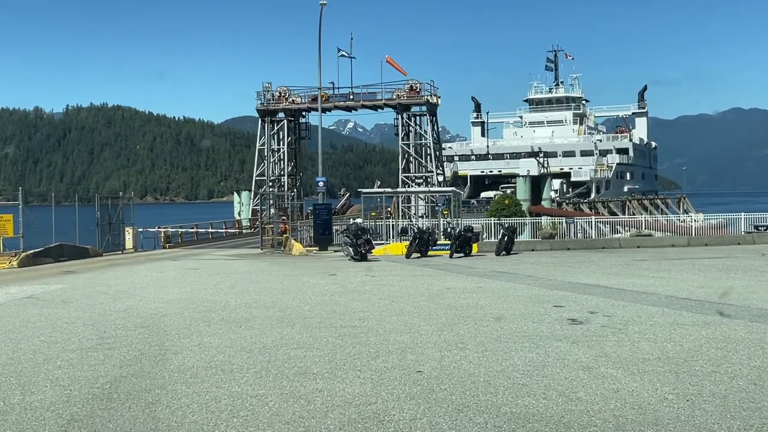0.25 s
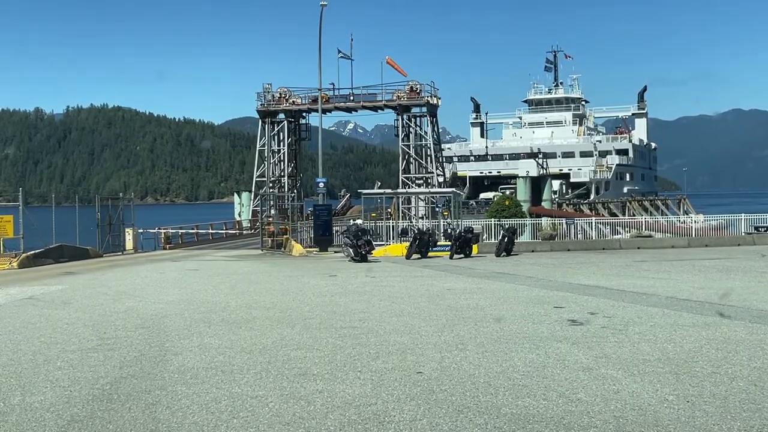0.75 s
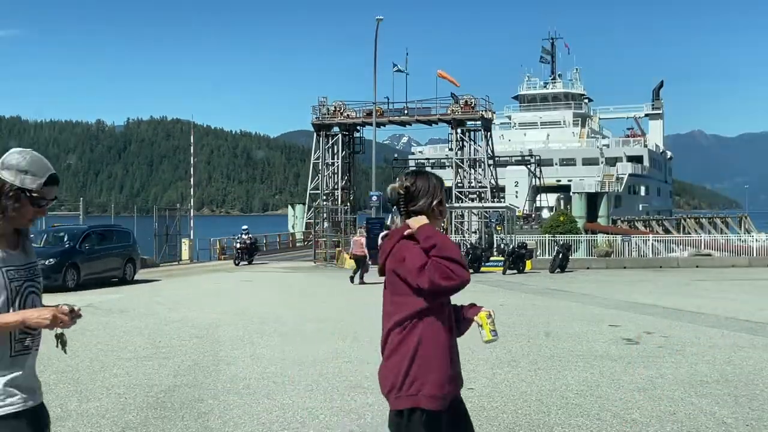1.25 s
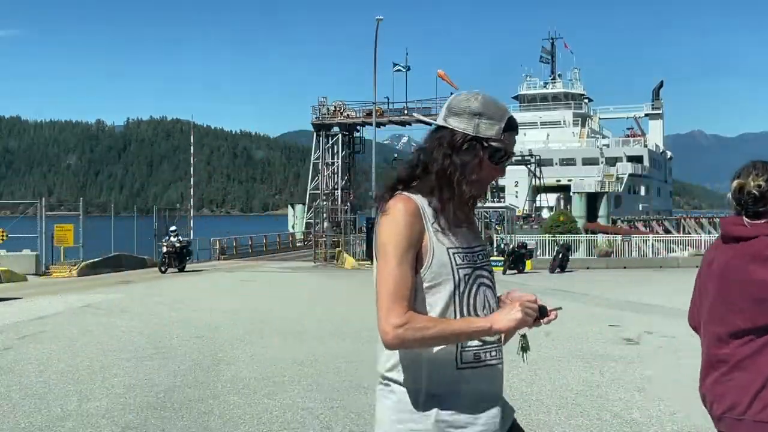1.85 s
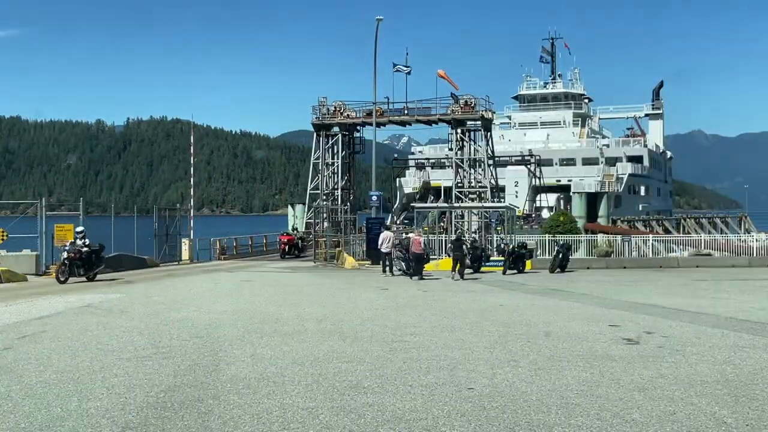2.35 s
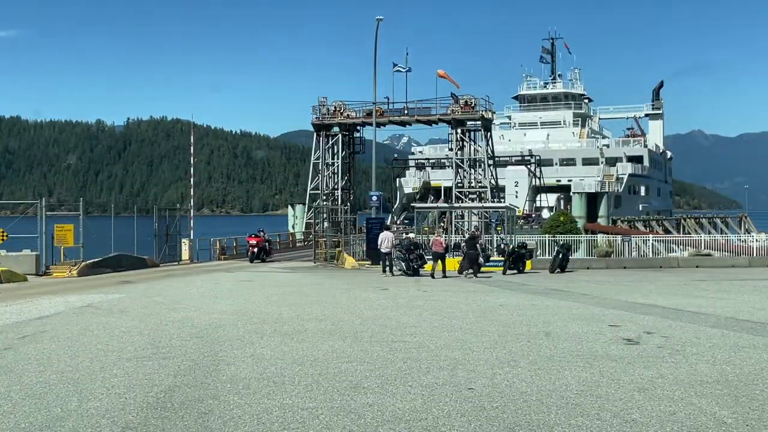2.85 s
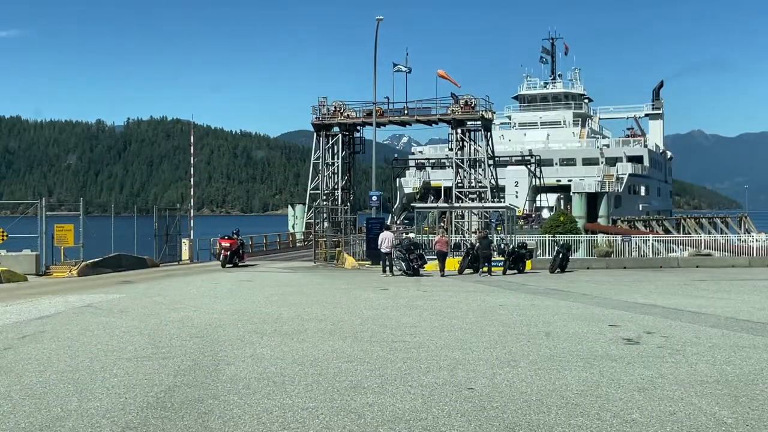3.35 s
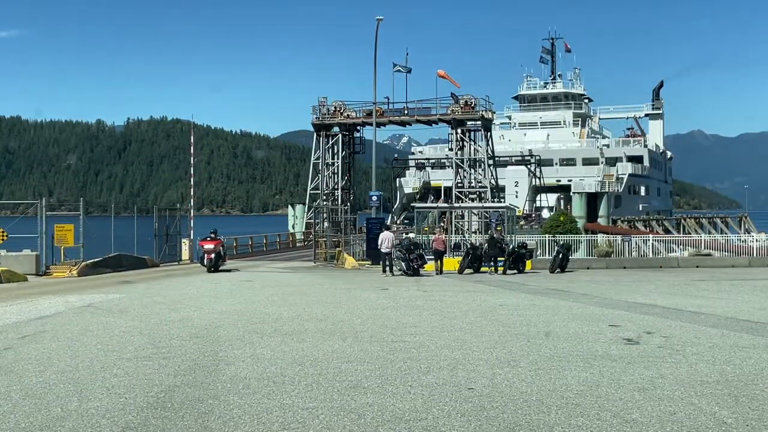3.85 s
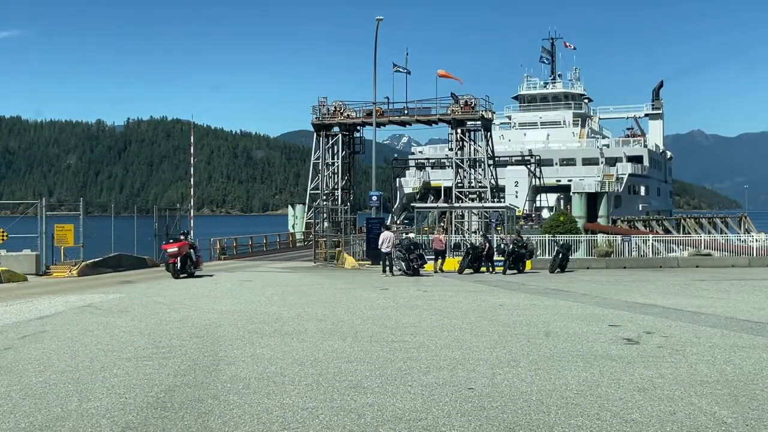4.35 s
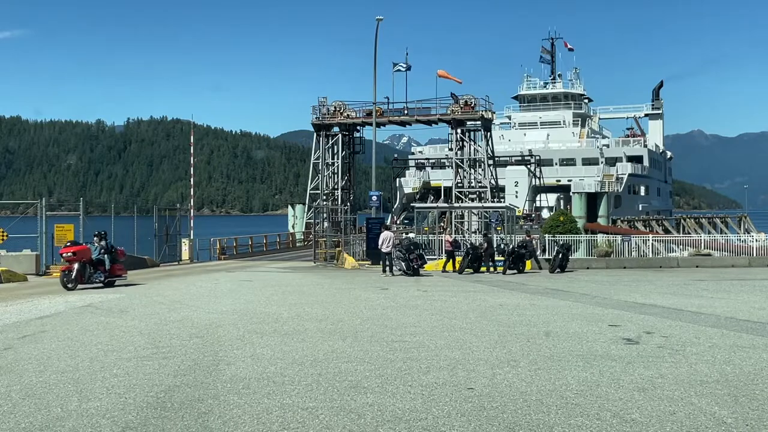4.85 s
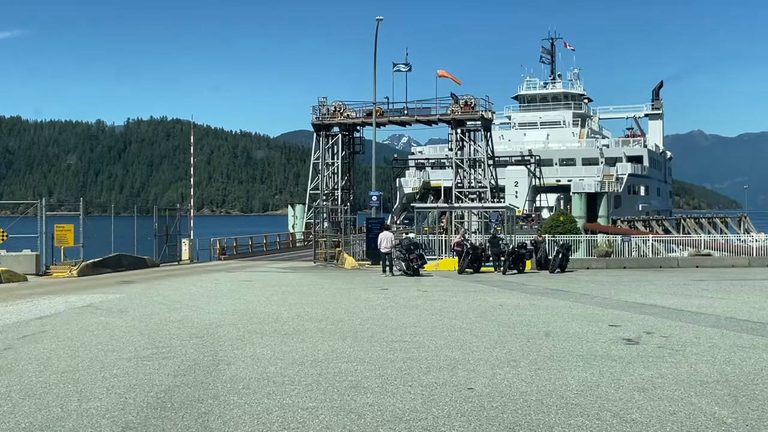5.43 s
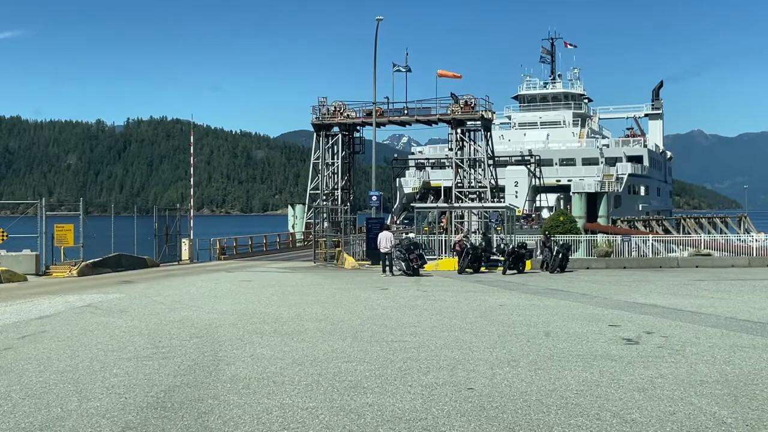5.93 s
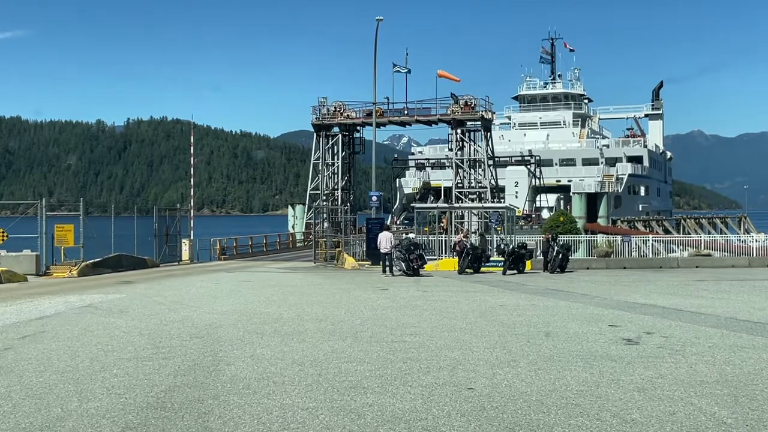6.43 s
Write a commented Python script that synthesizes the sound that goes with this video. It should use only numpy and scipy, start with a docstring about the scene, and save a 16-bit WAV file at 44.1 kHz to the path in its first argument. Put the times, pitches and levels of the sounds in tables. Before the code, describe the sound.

A quiet low hum inside a waiting car gives way abruptly to motorcycles riding off a ferry. A smoother engine rolls by first, while a two-cylinder bike chugs behind it with booming, ragged beats. A few small plastic knocks and rustles sound close by. The chugging bike then accelerates into a loud, rising drone, passes close with faint tyre hiss, and drops in pitch as the throttle shuts.

```python
"""First you hear the low hum inside a waiting car. After a second it gives way abruptly to motorcycles
riding off a ferry: a two-cylinder bike (the twin) chugs along behind a smoother one. Each firing of its
engine is one puff from the exhaust, and the car's cabin makes the puffs boom. The rider speeds up, so the
beats melt into a loud drone; the bike passes close with hissing tyres, then the throttle shuts.
A few small things knock, rustle and clink inside the car."""
import sys
import numpy as np
from scipy import signal
from scipy.fft import rfft, irfft, next_fast_len
from scipy.io import wavfile
from scipy.ndimage import uniform_filter1d

SR = 44100
rng = np.random.default_rng(int(sys.argv[2]) if len(sys.argv) > 2 else 0)


def store_pcm(level_fs):
    """Save levels as 16-bit WAV."""
    pcm = np.round(np.clip(level_fs, -1, 1) * 32767).astype(np.int16)
    wavfile.write(sys.argv[1], SR, np.atleast_2d(pcm).T)


N = 295029
TIME = np.arange(N) / SR
BIKES_S, OPEN_S, SHUT_S = .941, 4.66, 6.32  # the bikes come in, the throttle opens, the throttle shuts


# how fast the twin fires: t/s, f/Hz
FIRING_RATE = [(1.6, 17.8), (2.3, 19.35), (3.4, 16), (3.8, 17.6), (4.2, 22.3), (4.45, 22.8), (4.8, 29),
               (5.0, 33), (5.2, 37), (5.296, 39.5), (5.588, 46), (5.664, 49), (5.764, 49.6), (5.862, 52.3),
               (6.068, 55.6), (6.314, 57.4), (6.358, 55), (6.404, 54.8), (6.49, 48.7), (6.592, 41.6),
               (6.69, 38.9)]
def twin_engine():
    """Firing rate, running count of firings, roughness (0-1) and how far the throttle is shut (0-1)."""
    idle_hz = 16.5
    hz, shut = curve(FIRING_RATE), ramp(SHUT_S, 0.053)
    turns = np.cumsum(hz) / SR
    rough = np.clip((idle_hz / hz) ** 1.7 + 0.54 * shut, .01, 1)  # ragged at idle and once shut
    return hz, turns, rough, shut


# the drone's overall loudness: t/s, level/dB
DRONE_LEVEL = [(4.55, -24.5), (5.0, -15.5), (5.2, -12.5), (5.3, -10), (5.5, -9.5), (5.65, -12), (6.0, -5.5),
               (6.25, -2.5), (6.42, -4), (6.69, -10)]
# its tones: multiple of the firing rate, level/dB with the throttle open, level/dB with it shut
DRONE_TONES = [(2, -13.5, -18.5), (3, -21, -3), (4, -4.5, -2), (5, 0.5, -2), (6, -10.5, -17),
               (7, -4.5, -2.5), (8, -22.5, -18), (9, -25, -11.5)]
# which pitches the pipe and cabin favour: f/Hz, level/dB
DRONE_COLOUR = [(65.0, -39), (88.0, -4), (110.0, -1.6), (125.0, -8), (148, -17), (163, -16.5), (175, -33.5),
                (190.0, -15), (222.0, -14), (255.0, -18), (272.0, -29), (286.0, -15.5), (310.0, -44),
                (345.0, -15.5), (385.0, -20)]
# the same once the bike is heard from behind: f/Hz, level/dB
BEHIND_COLOUR = [(75, -13.5), (110, 1), (125, -8), (150, -20), (185, -9.5), (230, -19), (275, -13),
                 (305, -10.5), (345, -19.5), (400, -22), (490, -20.5), (560, -27)]
def drone(hz, turns, rough, shut):
    """Fast beats melt into low tones, each swelling as it slides through a pitch the pipe favours."""
    shaken = turns + (.005 + .018 * rough) * wander(29.4)
    tones = np.zeros(N)
    for k, open_db, shut_db in DRONE_TONES:
        db = (1 - shut) * (read(DRONE_COLOUR, k * hz) + open_db)
        db += shut * (read(BEHIND_COLOUR, k * hz) + shut_db)
        lag = .15 * k ** 2 + .6 * shut * wander(7)  # pipe and cabin delay the higher tones more
        tones += gain_of(db + 2.9 * rough * wander(11.7)) * np.cos(2 * np.pi * k * shaken - lag)
    return np.sqrt(2) * gain_of(curve(DRONE_LEVEL)) * tones * ramp(4.425, 0.41)


# how exhaust beats sound in the cabin: f/Hz, level/dB
CHUG_COLOUR = [(26, -62.5), (45, -57), (59, -71), (67, -10.5), (83, -3.5), (110, 10.5), (135, -2),
               (165, -18), (223, -11.5), (295, -13), (387, -25), (477, -10), (643, -27), (920, -34),
               (1420, -58), (1600, -62), (2080, -86), (3520, -120)]
# how their loudness moves: t/s, level/dB of the boom, level/dB of the thud above it
CHUG_LEVEL = [(0.96, -27, -43.5), (1.2, -38.5, -42.5), (1.32, -31, -42.5), (1.56, -36, -44),
              (1.62, -31.5, -41.5), (1.8, -36.5, -40.5), (1.98, -33, -43), (2.16, -39.5, -42),
              (2.22, -34.5, -44.5), (2.34, -39, -43.5), (2.82, -30.5, -40), (2.88, -35, -39.5),
              (3.36, -30, -38.5), (3.9, -36.5, -36), (4.32, -26, -36.5), (4.62, -28.5, -32.5),
              (4.86, -30, -29.5)]
def chug(turns, rough):
    """Ragged exhaust beats boom in the cabin, mixed with other bikes' until the twin draws near."""
    twin = evened(firings(turns, rough, scatter_db=1.3, limp=.05, jitter_s=.00025))
    twin = evened(.15 * twin + echoes(twin, t60=.25))
    other_turns = np.cumsum(43 + 4 * wander(2.996)) / SR
    others = evened(firings(other_turns, np.ones(N), scatter_db=0, limp=0.021, jitter_s=0.00396))
    others = others + .5 * echoes(others, t60=0.3)
    share = .8 - .55 * ramp(3.4, 1.1)
    beats = coloured(np.sqrt(1 - share ** 2) * twin + share * others, CHUG_COLOUR)
    boom = steadied(band(beats, 57.7, 152.7), seconds=0.096) * gain_of(curve(CHUG_LEVEL))
    thud = steadied(band(beats, 183.0, 400.5)) * gain_of(curve(CHUG_LEVEL, column=2) - 1.0)
    return (boom + thud) * (1 - ramp(4.67, 1.0))


# the tone of the low burble: f/Hz, level/dB
BURBLE_COLOUR = [(40, -54), (62, -38), (85, -1.5), (130, 9), (200, -3), (270, -7.5), (350, 3.5), (450, -5),
                 (560, -22), (900, -49.5), (2000, -74)]
def burble(hz, turns, shut):
    """Fuel burns unevenly: the burble clears with speed and is loudest once the throttle shuts."""
    pulses = firings(turns, np.ones(N), scatter_db=1.0, limp=0.49, jitter_s=0.00319)
    pulling_db = -31 - 15.5 * np.log2(np.maximum(hz / 39.3, 1))  # fades above 39.3 firings a second
    level = ramp(5.16, 0.096) * gain_of((1 - shut) * pulling_db - 25 * shut)
    beats = coloured(pulses + 1.67 * echoes(pulses, t60=0.24), BURBLE_COLOUR)
    return steadied(beats, seconds=0.041) * level


# the loudness of the exhaust's bark: t/s, level/dB
BARK_LEVEL = [(.95, -55.5), (2.05, -51.5), (3.8, -53), (4.4, -47), (4.82, -48.5), (4.93, -45.5),
              (5.25, -41.5), (5.6, -46.5), (6.0, -47), (6.28, -51), (6.35, -41), (6.45, -40.5), (6.58, -39),
              (6.64, -35.5), (6.69, -36)]
# its tone at full throttle: f/Hz, level/dB
OPEN_COLOUR = [(250, -22.5), (410, -7), (490, 4.5), (560, 10), (680, 4), (800, 1.5), (1000, -5), (1130, -9),
               (1400, -31), (2400, -53), (4000, -46)]
# its tone with the throttle shut: f/Hz, level/dB
SHUT_COLOUR = [(250, -13), (400, 8.5), (470, 3), (560, 1), (740, -5.5), (880, -3), (1130, -15),
               (1450, -7.5), (2000, -29), (4000, -41)]
def bark(turns, rough, shut):
    """The gritty edge of each beat, with a puff of gas; opening the throttle makes it brighter."""
    pulses = firings(turns, rough, scatter_db=1.8, limp=.08, jitter_s=.0007)
    pulses = band(.1 * pulses + echoes(pulses, t60=.13), 150, 1300)
    puffs = rng.standard_normal(N) * (1 + 0.3 * np.exp(-(turns % 1) / 1.5))
    gas = (.12 + .8 * ramp(OPEN_S, 0.27)) * steadied(pulses) + evened(puffs)
    soft = evened(band(coloured(gas, CHUG_COLOUR), 343, 1260))
    whirr = gain_of(-17.0) * evened(band(gas, 844, 974, order=2))
    hard = (1 - shut) * evened(coloured(gas, OPEN_COLOUR)) + shut * evened(coloured(gas, SHUT_COLOUR))
    bright = ramp(4.85, 0.46)
    # the pipe rings hollow as the throttle opens
    honk = gain_of(-39.5) * swell(5.02, 0.13) * steadied(band(gas, 465, 513, order=2))
    return steadied((1 - bright) * (soft + whirr) + bright * hard) * gain_of(curve(BARK_LEVEL)) + honk


# high engine tones: multiple of the firing rate (played rounded), level/dB far, coming and alongside
BUZZ_TONES = [(8, -44, -40, -44.5), (9, -56, -44, -50), (9.96, -50, -44, -42.5), (11, -45.5, -42, -42),
              (12.07, -50, -44.5, -40.5), (12.92, -44.5, -44, -39), (14.22, -49, -49.5, -44.5),
              (14.7, -52, -55, -49.5), (16.07, -53, -42, -47), (16.854, -53.5, -50, -56),
              (18, -58, -47, -54), (18.8, -61, -57.5, -63.5), (19.9, -59, -59, -60), (24.2, -58, -67, -72),
              (25.42, -56, -67, -74)]
# where the pipe rings: f/Hz, half-width/Hz, boost/dB
PIPE_RINGS = [(488, 10, 9.5), (690, 7.2, 9), (795, 5, 4.5), (998, 10, 7)]
def buzz(hz, turns, rough, shut):
    """High tones grow as the throttle opens, fluttering and swelling where the pipe rings."""
    coming, passed = ramp(5.55, 0.29), ramp(6.0, 0.15)
    shaken = turns + (.002 + .012 * rough) * wander(22)
    tones = np.zeros(N)
    for k, far_db, coming_db, alongside_db in BUZZ_TONES:
        db = (1 - passed) * ((1 - coming) * far_db + coming * coming_db) + passed * alongside_db
        db += 2.2 * wander(6)
        db += sum(boost / (1 + ((k * hz - pipe_hz) / width) ** 2) for pipe_hz, width, boost in PIPE_RINGS)
        tones += gain_of(db) * np.cos(2 * np.pi * (round(k) * shaken + rng.random()))
    return np.sqrt(2) * tones * gain_of(-9.5 * shut) * ramp(OPEN_S, 0.64) ** 2


# the twin's whines: start t/s, end t/s, start f/Hz, end f/Hz, half-width/Hz, level/dB
WHINES = [(5.2, 5.6, 3680, 4380, 99, -56), (5.14, 6.5, 4200, 4100, 151, -63),
          (5.15, 6.3, 4650, 5080, 130, -63), (5.14, 6.05, 10200, 10800, 260, -65.5),
          (5.74, 5.95, 4830, 4520, 80, -62), (5.76, 6.8, 2500, 4900, 64, -63),
          (5.9, 6.1, 3900, 3950, 120, -57.5), (5.92, 6.13, 5050, 5030, 110, -62)]
def whines():
    """Fuzzy whines swell and fade, sliding up or down as the twin passes."""
    out = np.zeros(N)
    for start, end, start_hz, end_hz, width_hz, db in WHINES:
        along = ramp(start, end - start)
        tone = np.exp(2j * np.pi * np.cumsum(start_hz + (end_hz - start_hz) * along) / SR)
        fuzz = wander(width_hz) + 1j * wander(width_hz)
        out += gain_of(db) * np.sin(np.pi * along) * (tone * fuzz).real
    return out


# how fast the leading bike fires: t/s, f/Hz
LEAD_RATE = [(1, 48.5), (1.5, 48), (2.0, 50), (2.4, 51), (2.8, 50), (3.1, 48.5), (3.6, 47.5), (4, 47)]
# its overall loudness: t/s, level/dB
LEAD_LEVEL = [(1, -50.5), (1.8, -43), (2.3, -40), (2.8, -41), (3.4, -41), (4, -43.5)]
# its tones: multiple of the firing rate, level/dB
LEAD_TONES = [(2, 1.5), (4, 0), (6, -15), (9, -12), (18, -24)]
def lead_bike():
    """A smoother engine ahead of the twin rolls by at a nearly even speed."""
    turns = np.cumsum(curve(LEAD_RATE) + .15 * wander(7)) / SR
    tones = sum(gain_of(db + 2 * wander(9.3)) * np.cos(2 * np.pi * k * turns) for k, db in LEAD_TONES)
    return gain_of(curve(LEAD_LEVEL)) * tones * (1 - ramp(4.003, 0.18))


def far_bike():
    """A farther engine hums briefly, its pitch rising and falling with its loudness."""
    arch = np.sin(np.pi * ramp(3.5, 1.5))
    turns = np.cumsum(213 + 9 * arch) / SR
    return gain_of(-38 + 2.0 * wander(8.8)) * arch * np.cos(2 * np.pi * turns)


# the hiss from far off: f/Hz, level/dB
FAR_HISS_COLOUR = [(590, 4.5), (1000, 0), (1160, -3), (1330, -0.5), (1430, -6.5), (1580, -2), (2450, -8.5),
                   (3110, -6.5), (3450, -11.5), (3960, -3.5), (5720, -12.5), (9360, -12.5), (12500, -18),
                   (14100, -17.5), (15500, -45)]
# the hiss from close by: f/Hz, level/dB
NEAR_HISS_COLOUR = [(760, 2.5), (1300, 3), (1470, -4.5), (1620, 0), (1790, -5), (2250, -6.5), (3380, -8.5),
                    (3710, -2), (4420, -8.5), (4950, -5), (5440, -9), (10800, -14), (14000, -22),
                    (15000, -32), (15500, -39)]
# narrow bands that ring in it: f/Hz, width/Hz, level/dB
HISS_RINGS = [(3130, 520, -17), (3870, 250, -10.5), (4820, 230, -20), (5950, 130, -20.5)]
# each bike's swell of hiss: t/s when nearest, level/dB, half-width/s
PASSES = [(3.5, -56, 0.67), (5.98, -48, 0.87)]
def hiss(turns):
    """Tyres and engines hiss, throbbing faintly with the firings and swelling as each bike passes."""
    noise = rng.standard_normal(N) * (1 + 0.11 * np.cos(2 * np.pi * turns)) * gain_of(0.9 * wander(9))
    noise = .96 * noise + .28 * echoes(noise, t60=.05)
    far_hiss = gain_of(1.43) * evened(coloured(noise, FAR_HISS_COLOUR))
    near_hiss = gain_of(3.0) * evened(coloured(noise, NEAR_HISS_COLOUR))
    rings = sum(gain_of(db) * evened(band(noise[::-1], hz - width / 2, hz + width / 2, order=1))
                for hz, width, db in HISS_RINGS)
    passing = sum(gain_of(db) ** 2 / (1 + ((TIME - s) / width) ** 2) ** 2.44 for s, db, width in PASSES)
    level = np.sqrt(gain_of(-58.5) ** 2 + passing)
    near = ramp(4.73, 0.87)
    return level * ((1 - near) * far_hiss + near * near_hiss + rings)


# the tone of tyres close by: f/Hz, level/dB
TYRE_COLOUR = [(1000, -22), (2400, 3), (4000, -7), (7000, -1.5), (11000, -5), (15000, -9)]
def tyre_rush():
    """Tyres hiss brightly for a moment as the twin comes alongside."""
    return gain_of(-51) * swell(5.75, 0.098) * evened(coloured(rng.standard_normal(N), TYRE_COLOUR))


# knocks: t/s, click level/dB, click f/Hz, hollow ring level/dB, f/Hz that the struck spot favours
KNOCKS = [(2.080, -51, 3900, -57, 700), (2.0944, -47, 8200, -48, 700), (2.1125, -39, 3640, -46, 700),
          (2.982, -45, 4300, -29, 1130), (2.986, -40.5, 4770, -32, 1143), (3.002, -42.5, 5600, -36, 1143),
          (3.014, -44, 4570, -37, 1143), (3.261, -46, 2000, -22, 760), (3.4695, -21.5, 5100, -13, 1140),
          (3.473, -39, 6300, -13.5, 330), (3.480, -34, 3900, -18, 566), (3.525, -43, 6400, -50, 1140)]
# the notes of the car's plastic trim: f/Hz, level/dB, time to die away/s
TRIM_NOTES = [(236, -2, 0.07), (328, -0.5, 0.05), (545, 3, 0.089), (620, 0, 0.084), (770, -0.5, 0.04),
              (1122, -3, 0.027), (1306, -10.5, 0.055)]
# the dry tone of clicks and rustles: f/Hz, level/dB
CRISP = [(300, 18.5), (1100, 3.0), (1900, -1.5), (4000, 2.0), (6300, -0.5), (9000, -5.5), (15000, -8.5)]
def knocks():
    """Plastic trim is knocked: a dry click with a short bright ring over a hollow one."""
    out, t = np.zeros(N), np.arange(SR // 5) / SR
    for s, click_db, click_hz, hollow_db, spot_hz in KNOCKS:
        fade = gain_of(-60 * t / 0.041) + 0.036 * gain_of(-60 * t / 0.6)
        burst = rng.standard_normal(len(t)) * fade * (1 - np.exp(-t / 0.0003))
        bright = gain_of(5.5) * band(burst, click_hz - 310, click_hz + 310, order=1)
        click = coloured(burst, CRISP) + bright
        # notes lose 22 dB for each octave away from the favoured pitch
        hollow = sum(gain_of(db - 22 * abs(np.log2(hz / spot_hz)) - 60 * t / t60)
                     * np.sin(2 * np.pi * (hz * t + rng.random())) for hz, db, t60 in TRIM_NOTES)
        hollow *= (1 - np.exp(-t / 0.00076)) / 2
        add(out, s, gain_of(click_db) * click + gain_of(hollow_db) * hollow)
    return out


# rustles: t/s, length/s, level/dB of the fizz, level/dB of the duller body
RUSTLES = [(2.08, 0.044, -48.5, -56.5), (2.259, 0.05, -53.5, -76), (2.977, 0.041, -51, -50.5),
           (3.391, 0.04, -54, -83), (3.523, 0.051, -47, -60), (3.791, 0.043, -47.5, -67),
           (4.056, 0.045, -50.5, -58), (4.74, 0.092, -52, -82), (5.021, 0.095, -48, -64.5),
           (6.399, 0.056, -40, -46)]
def rustles():
    """Things brush against each other in short, grainy bursts of noise."""
    out = np.zeros(N)
    for s, length, fizz_db, body_db in RUSTLES:
        size = int(length * SR)
        grains = rng.standard_normal(size)
        flicker_db = 3 * evened(uniform_filter1d(rng.standard_normal(size), 60))
        grains *= gain_of(flicker_db) * signal.windows.tukey(size, .85)
        fizz = gain_of(fizz_db) * evened(coloured(grains, CRISP))
        body = gain_of(body_db) * evened(band(grains, 790, 1120, order=2))
        add(out, s, fizz + body)
    return out


# clinks: t/s, level/dB
CLINKS = [(5.05, -62), (6.41, -43), (6.44, -45)]
# the metal's notes: f/Hz, level/dB, time to die away/s
METAL_NOTES = [(3960, -6, 0.11), (4650, 4, 0.091), (4840, -7, 0.11)]
def clinks():
    """Small metal pieces touch and ring briefly."""
    out, t = np.zeros(N), np.arange(SR // 5) / SR
    ring = sum(gain_of(db - 60 * t / t60) * np.sin(2 * np.pi * hz * t) for hz, db, t60 in METAL_NOTES)
    for s, level_db in CLINKS:
        add(out, s, gain_of(level_db) * ring)
    return out


# the quiet cabin's rumble: f/Hz, level/dB
CABIN_COLOUR = [(13, -56.5), (24, -14), (36, -7), (63, -11), (77, -13), (90, -9), (153, -15), (192, -22.5),
                (259, -24.5), (378, -36), (480, -35), (700, -43), (1090, -46), (2100, -47), (2800, -55),
                (7000, -70), (9000, -80), (11700, -120)]
# the tones of its hum: f/Hz, level/dB
HUM_TONES = [(41, -48), (56, -44), (156.5, -54), (237, -57.5)]
def cabin():
    """Low rumble, a wavering hum and one soft bump in the waiting car."""
    rumble = gain_of(-44) * evened(coloured(rng.standard_normal(N), CABIN_COLOUR))
    hum = np.zeros(N)
    for hz, db in HUM_TONES:
        level = gain_of(db + 1.9 * wander(2.7))
        hum += level * np.sin(2 * np.pi * np.cumsum(hz + 0.98 * wander(4.0)) / SR)
    bump = gain_of(-42.5) * swell(.862, 0.0079) * np.sin(2 * np.pi * 290 * TIME)
    return rumble + np.sqrt(2) * hum + bump


# how wide each pitch sounds: f/Hz, level/dB of the difference between the sides
STEREO_WIDTH = [(40, -14), (75, -51), (110, -14.5), (200, -9.5), (400, -5.5), (700, -4.5), (1200, 4),
                (2100, -0.5), (3300, 0), (4200, -12.5), (8000, -109), (12000, -43), (14500, 6.5)]
# how much louder the left is than the right: f/Hz, level/dB
BALANCE = [(60, 1), (100, -1), (160, 1.5), (270, -1), (350, 3), (450, 1), (740, 1), (1200, -.5),
           (2000, -0.5), (3300, 4), (5500, -0.5), (9000, 0.5)]
def widen(mid, scattered):
    """Sound from the windows reaches left and right out of step; scattered noise differs too."""
    size = next_fast_len(N + SR)
    out_of_step = signal.hilbert(mid, size).imag[:N]
    width = gain_of(read(STEREO_WIDTH, np.fft.rfftfreq(size, 1 / SR)))
    side = irfft(rfft(.68 * out_of_step + .85 * scattered, size) * width, size)[:N]
    lean = np.array(BALANCE) * [1, .5]  # half of the imbalance goes to each side
    return np.array([coloured(mid + side, lean), coloured(mid - side, lean * [1, -1])])


def firings(turns, rough, scatter_db, limp, jitter_s):
    """One pulse a firing; limp makes one cylinder stronger, roughness scatters size and timing."""
    at = np.flatnonzero(np.diff(np.floor(turns)))
    size, late = rng.standard_normal((len(at), 2)).T
    cylinder = (-1) ** np.arange(len(at))
    moment = np.clip(at + SR * jitter_s * rough[at] * late, 0, N - 1).astype(int)
    pulses = np.zeros(N)
    pulses[moment] = gain_of(scatter_db * np.sqrt(rough[at]) * size) * (1 + limp * cylinder)
    return pulses


def echoes(x, t60):
    """A short blur of echoes that fades by 60 dB in t60 seconds."""
    t = np.arange(SR // 4) / SR
    tail = rng.standard_normal(len(t)) * gain_of(-60 * t / t60)
    return signal.oaconvolve(x, tail / np.linalg.norm(tail))[:N]


def coloured(x, colour):
    """Makes each pitch as strong as a colour table says; every pulse rings after it strikes."""
    db = read(colour, abs(np.fft.fftfreq(8192, 1 / SR)))
    log_gain = np.log(gain_of(np.maximum(db, -100)))
    ring = np.fft.ifft(np.exp(np.conj(signal.hilbert(log_gain)))).real[:4096]
    return signal.oaconvolve(x, ring)[:len(x)]


def band(x, low_hz, high_hz, order=4):
    """Keeps the pitches between two limits."""
    return signal.sosfilt(signal.butter(order, [low_hz, high_hz], "band", fs=SR, output="sos"), x)


def wander(per_s):
    """A smooth random wobble of typical size 1, up to about per_s swings a second."""
    steps = np.arange(0, N / SR + 1, 1 / 1000)
    rolloff = 1 + (np.fft.rfftfreq(len(steps), steps[1]) / per_s) ** 4
    slow = irfft(rfft(rng.standard_normal(len(steps))) / rolloff, len(steps))
    return evened(np.interp(TIME, steps, slow))


def gain_of(db):
    """Decibels to amplitude."""
    return 10 ** (np.asarray(db) / 20)


def evened(x):
    """Scales to an average strength (rms) of 1."""
    return x / np.sqrt(np.mean(x ** 2) + 1e-20)


def steadied(x, seconds=0.11):
    """Holds the strength near 1 over time, keeping the single beats."""
    size = int(seconds * SR)
    return x / np.sqrt(abs(uniform_filter1d(uniform_filter1d(x ** 2, size), size // 2)) + 1e-14)


def curve(rows, column=1):
    """One column of a table of times, at every sample."""
    rows = np.asarray(rows)
    return np.interp(TIME, rows[:, 0], rows[:, column])


def read(colour, hz):
    """A colour table's levels at the given frequencies."""
    f, db = np.transpose(colour)
    return np.interp(np.log(hz + 1), np.log(f + 1), db)


def ramp(start_s, length_s):
    """Rises from 0 to 1, then stays."""
    return np.clip((TIME - start_s) / length_s, 0, 1)


def swell(s, width_s):
    """A smooth bump of height 1 at time s."""
    return np.exp(-((TIME - s) / width_s) ** 2)


def add(mix, s, sound):
    """Mixes a sound in at time s."""
    part = mix[round(s * SR):][:len(sound)]
    part += sound[:len(part)]


def scene():
    """The quiet cabin, then the bikes; speed and throttle shape the twin's exhaust."""
    hz, turns, rough, shut = twin_engine()
    twin = (chug(turns, rough) + drone(hz, turns, rough, shut) + burble(hz, turns, shut)
            + bark(turns, rough, shut) + buzz(hz, turns, rough, shut) + whines())
    rumble = gain_of(-58.5) * evened(band(rng.standard_normal(N), 51, 84, order=2))
    bikes = twin + lead_bike() + far_bike() + hiss(turns) + tyre_rush() + rumble
    # the same layers with fresh randomness make left and right differ
    scattered = (bark(turns, rough, shut) + hiss(turns) + burble(hz, turns, shut)
                 + 0.85 * buzz(hz, turns, rough, shut) + 0.12 * chug(turns, rough))
    bikes_on = ramp(BIKES_S, 0.0084)
    mid = (1 - bikes_on) * cabin() + bikes_on * bikes
    mid += band(knocks() + rustles(), 130, 18000, order=2) + clinks()
    end_fades = signal.windows.tukey(N, .002)
    return widen(end_fades * mid, end_fades * bikes_on * scattered)


def record(dry):
    """Removes the highest treble, above 15150 Hz."""
    low_pass = signal.firwin(511, 15150, window=("kaiser", 9), fs=SR)
    return signal.oaconvolve(dry, low_pass[None], "same")


dry = scene()
out = record(dry)
store_pcm(out)
```